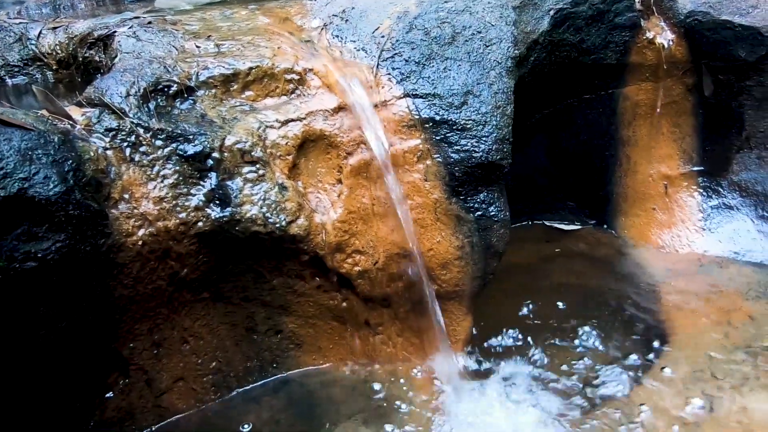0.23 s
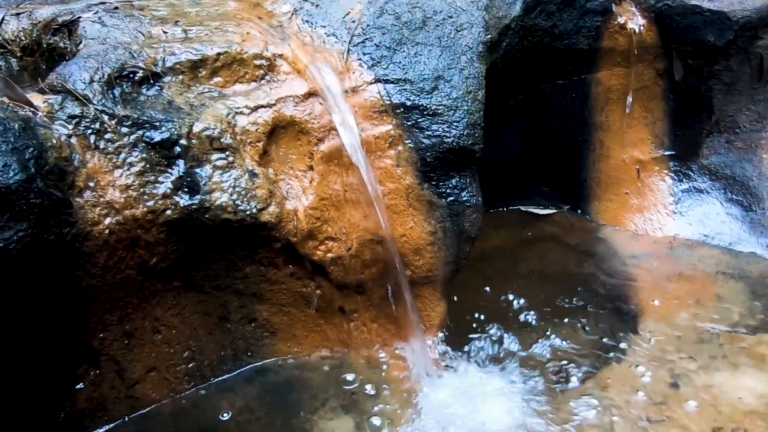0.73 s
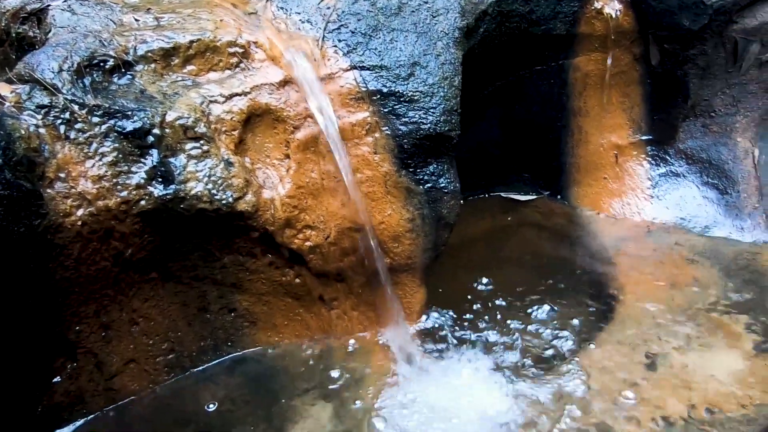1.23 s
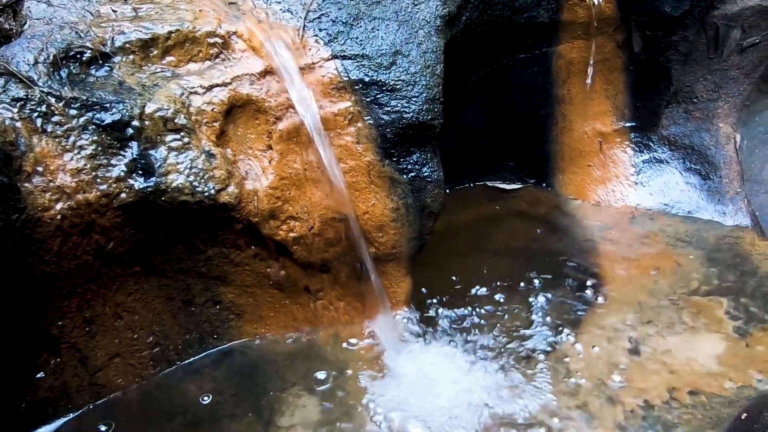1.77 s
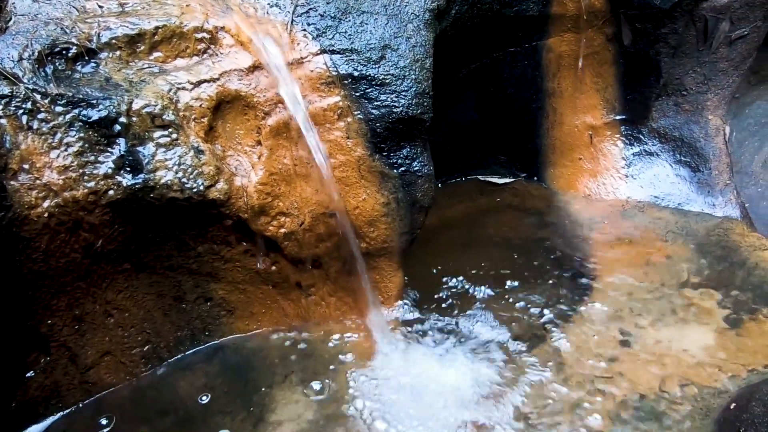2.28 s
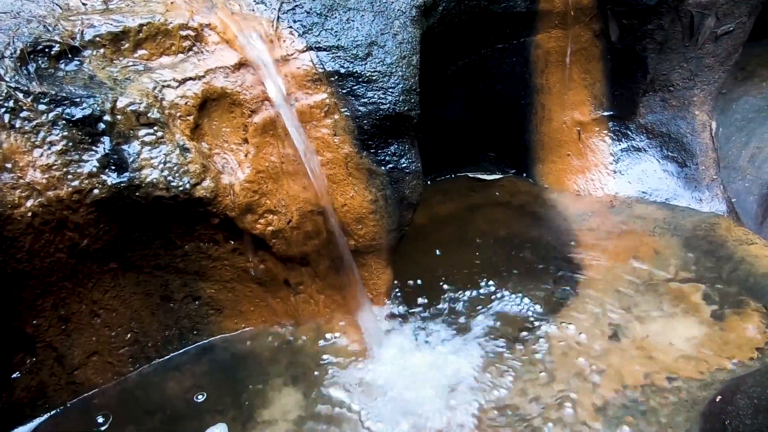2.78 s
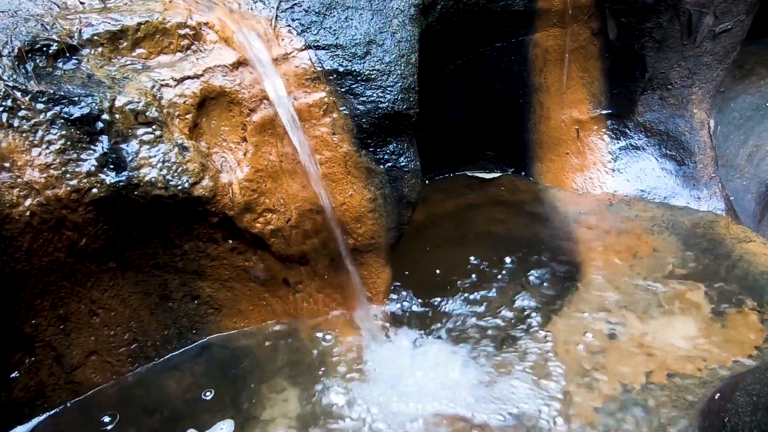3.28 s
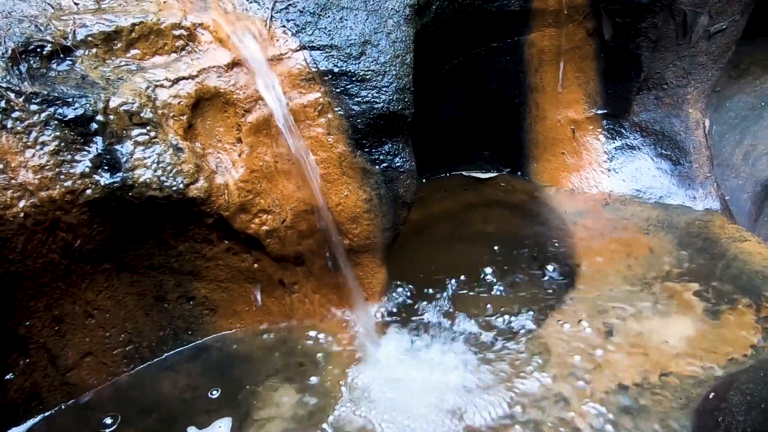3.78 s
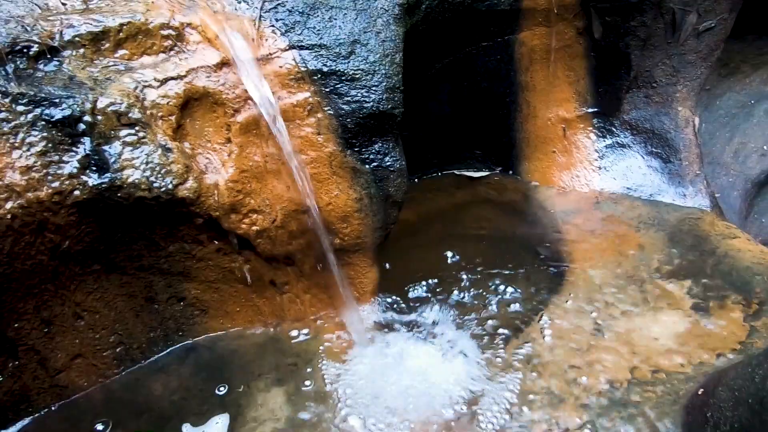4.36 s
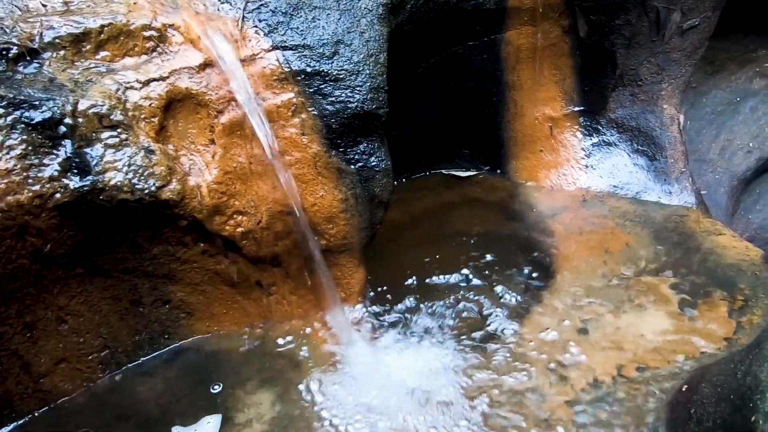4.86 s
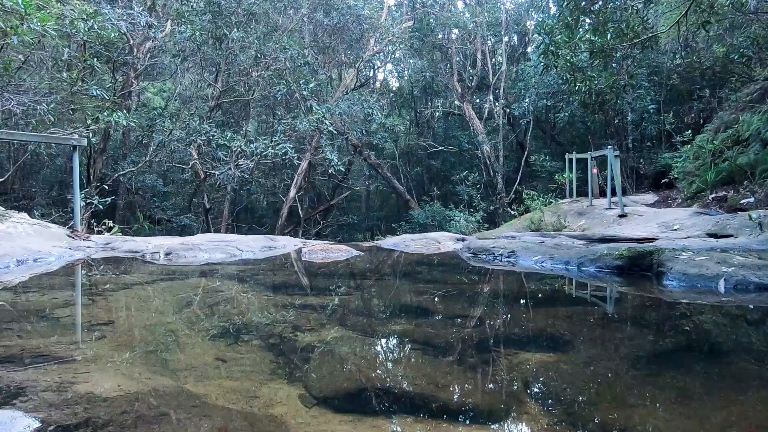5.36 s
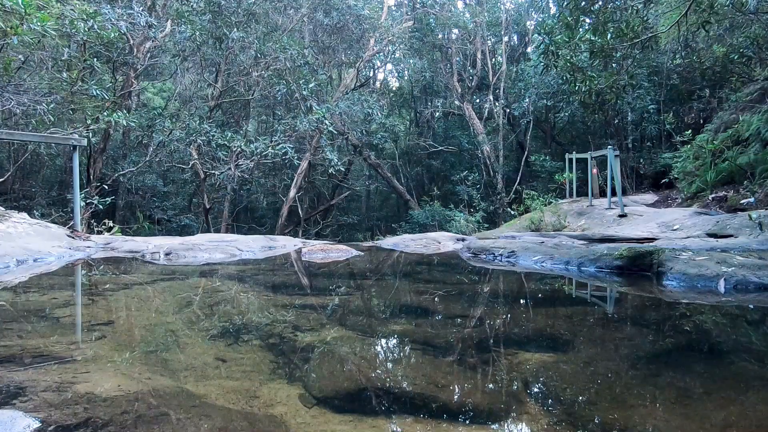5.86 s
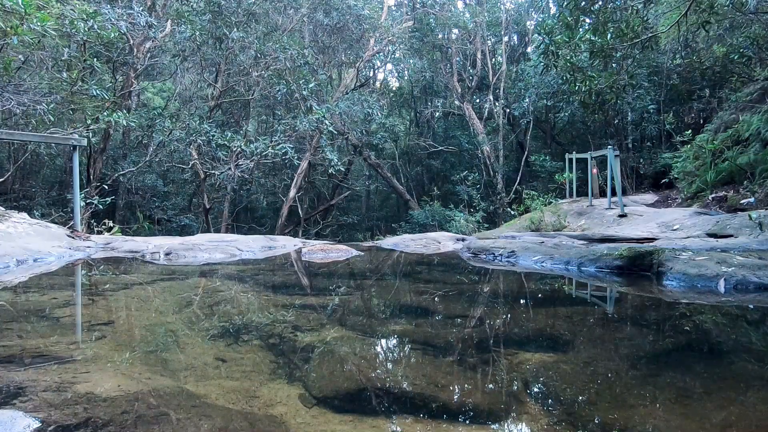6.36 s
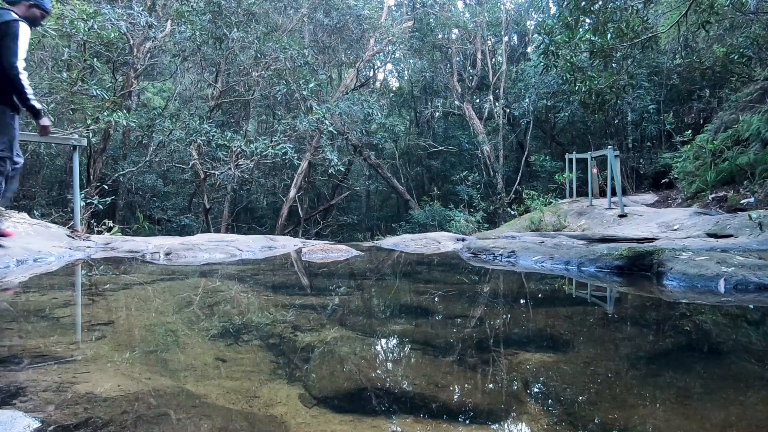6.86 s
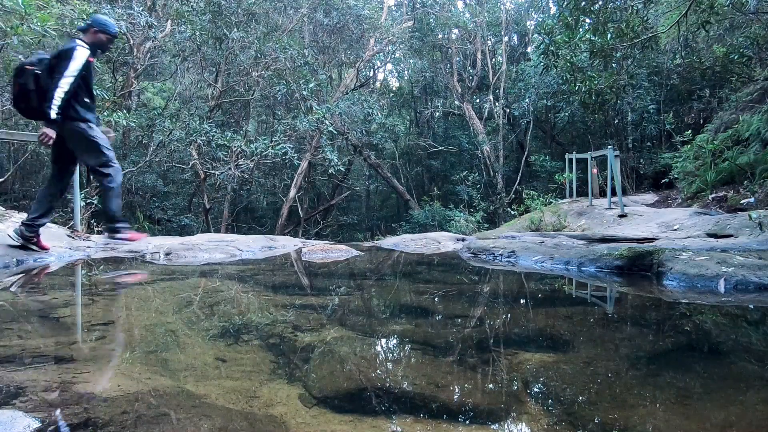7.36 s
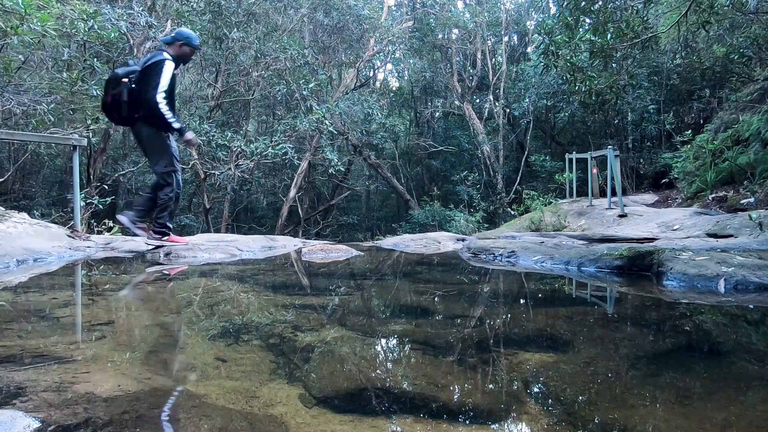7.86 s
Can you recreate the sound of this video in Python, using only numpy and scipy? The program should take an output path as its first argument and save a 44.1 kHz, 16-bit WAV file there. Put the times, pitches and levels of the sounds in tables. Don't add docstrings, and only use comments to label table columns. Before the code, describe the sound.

From 0 s, a thin stream plunges close by into a small pool in a rock hollow. The first second is boomy and nearly mono: heavy low glugs around 160-200 Hz, hollow mid bloops gliding upward, dense bubbling and tiny high pings. From about 0.5 to 2.3 s a bright spray hiss fades in and the image widens, while the glugs thin out. Through 2-5 s, irregular ringing drops around 2-3 kHz, sharp snaps and crisp spatters on stone ride over continuous gurgling, with strong plinks near 1.2 and 3.2 s. Between 5.05 and 5.65 s the pool drops away quickly. A much quieter forest pond remains: smooth far water hiss, dull air, faint low gurgles. Soft gritty footsteps on stone, slightly left, come near 6.05, 6.55, 6.9, 7.2 and 7.65 s, the last with a pebble click. One faint, steady bird whistle sounds at 7 s. It ends at about 8 s.

```python
import sys
import numpy as np
from scipy import signal
from scipy.fft import rfft, irfft, next_fast_len
from scipy.io import wavfile

SR = 44100
rng = np.random.default_rng(int(sys.argv[2]) if len(sys.argv) > 2 else 0)


def master_out(mix):
    frames = np.transpose(np.atleast_2d(mix))
    ceiling = np.clip(frames, -1, 1)
    pcm = np.round(ceiling * 32767).astype(np.int16)
    wavfile.write(sys.argv[1], SR, pcm)


def how_loud(loudness_db):
    steps = np.asarray(loudness_db, float) / 20
    return 10 ** steps


N = 358091
SIZE = next_fast_len(N + SR // 2)
HZ = np.maximum(np.arange(SIZE // 2 + 1) * SR / SIZE, 1)


def curves(rows):
    s, *columns = np.transpose(rows)
    return [np.interp(np.arange(N) / SR, s, c) for c in columns]


def at_hz(points, hz):
    f, value = np.array(points).T
    return np.interp(np.log(hz), np.log(f), value)


def rms_one(x):
    return x / np.sqrt(np.mean(x ** 2) + 1e-20)


def drift(rate):
    r = np.exp(-80 * np.pi * rate / SR)
    slow = signal.lfilter([1], [1, -2 * r, r * r], rng.standard_normal(N // 40 + 2002))[2000:]
    return np.interp(np.arange(N) / 40, np.arange(len(slow)), rms_one(slow))


def filtered(x, response):
    return irfft(rfft(x, SIZE) * response, SIZE)[..., :N]


def modes(table, direct_db):
    return how_loud(direct_db) + sum(how_loud(db) / (1 + 1j * (HZ - f * f / HZ) / width) for f, width, db in table)


def left_right(mid, side):
    return np.array([mid + side, mid - side])


def ramp(start_s, for_s):
    return np.clip((np.arange(N) / SR - start_s) / for_s, 0, 1)


def swells(rows, rise_s, fall_s):
    kicks, t = np.zeros(N), np.arange(SR // 2) / SR
    for s, db, *_ in rows:
        kicks[round(s * SR)] = how_loud(db)
    shape = (1 - np.exp(-t / rise_s)) * np.exp(-t / fall_s)
    return np.abs(signal.fftconvolve(kicks, shape / shape.max())[:N])


def plops(rows, cycles, rise, onset, trail_s=0, trail_db=-6, spread_oct=0, count=1):
    out, chance = np.zeros((2, N)), rng.random((len(rows), count, 2))
    chance[:, 0] = [0, .5]
    for (s, db, centre_hz, *pan_db), cluster in zip(rows, chance):
        pan = np.tanh(0.15 * sum(pan_db))
        for late, detune in cluster:
            hz = centre_hz * 2 ** (spread_oct * (2 * detune - 1))
            turn = np.arange(int(cycles * SR / hz)) * hz / SR
            shape = (1 - np.exp(-turn / onset)) ** 2 * how_loud(-60 * turn / cycles)
            level = how_loud(db + trail_db * np.sqrt(late)) / shape.max()
            wave = level * shape * np.sin(2 * np.pi * turn * (1 + rise * turn))
            i = round((s + trail_s * late) * SR)
            out[:, i:i + len(wave)] += wave[:N - i] * [[1], [pan]]
    return out


# t/s, level/dB
LEAVE = [
    (5.05, -6.5),
    (5.28, -11),
    (5.38, -14),
    (5.5, -11.5),
    (5.56, -25.5),
    (5.65, -65),
]


def nearness():
    return np.minimum(how_loud(curves(LEAVE)[0]), 1)


# t/s, level/dB
PLUNGE = [(0, 14), (.12, 5), (.47, 7.5), (.72, 6), (.95, 4.5), (1.3, 1), (1.7, 0), (2.1, 2.5), (2.5, -1),
          (2.85, 0.5), (3.1, 1), (4.2, -2), (5.0, -0.5), (5.2, 1)]


def plunge():
    return curves(PLUNGE)[0]


# f/Hz, width/Hz, level/dB
HOLLOW = [(161.8, 7.1, -12.5), (181, 29, -4), (403, 47.5, -3.5), (534.4, 9.3, -15.5), (700, 23, -9.5),
          (750.4, 17, -10), (1083, 92, -15), (1295, 132, -12), (1597, 64, -17.5), (1794, 146, -18),
          (2125, 31, -11.5), (2342, 68, -6.5), (2430, 20, -14.5), (2724, 35, -15.5), (2640, 41, -18),
          (2880, 41, -8.5), (3005, 71, -11.5), (3260, 59, -8.5), (4720, 1450, -18)]
# f/Hz, width/Hz, level/dB
ACROSS = [(155, 36, -94), (525, 41, -16), (757, 21, -7), (1160, 290, -13), (1600, 37, -9.5),
          (2020, 90, -13), (2290, 100, -10.5), (2900, 180, -27)]


def ring_hollow(mid_side):
    return filtered(mid_side, [modes(HOLLOW, direct_db=-20.0), modes(ACROSS, direct_db=-44.0)])


# f/Hz, level/dB
BUBBLES = [(120, -7), (250, -0.5), (500, 5), (1000, -0.5), (2000, -5), (3500, -7), (5000, -8.5),
           (6500, -15), (8500, -11), (10500, -24), (13000, -19)]


def froth(low_hz, high_hz, per_s, cycles, uneven_db, clump_db, wash_db, count):
    sizes = how_loud(uneven_db * np.minimum(rng.exponential(1, N), 5)) * rng.choice([-1, 1], N)
    births_per_s = per_s * how_loud(clump_db * drift(14))
    sizes = sizes * (rng.random(N) < births_per_s / SR)
    sizes = rms_one(sizes) + how_loud(wash_db) * rng.standard_normal(N)
    placed = np.array([sizes, sizes * rng.standard_normal(N)])
    dealt, out = rng.integers(0, count, N), 0
    for k, hz in enumerate(np.geomspace(low_hz, high_hz, count)):
        r, w = how_loud(-60 * hz / (cycles * SR)), 2 * np.pi * hz / SR
        resonance = [(1 - r * r) / 2, 0, (r * r - 1) / 2, 1, -2 * r * np.cos(w), r * r]
        soft = signal.sosfilt([resonance, resonance], placed * (dealt == k))
        out = out + how_loud(at_hz(BUBBLES, hz)) * soft
    return out


def bubble_crowds():
    plunge_db, near = plunge(), nearness()
    stir = swells(GLUGS, rise_s=0.0065, fall_s=0.14) / how_loud(-17.5)
    spit = swells(SPLATS + DROPS, rise_s=0.0042, fall_s=0.0086) / how_loud(-22)
    gurgle = how_loud(-8.5) * swells(FAR_GURGLES, rise_s=0.0061, fall_s=0.023)
    far = (how_loud(-64.5) + gurgle) * (1 - near)
    deep = froth(142.6, 197.8, per_s=240, cycles=6.3, uneven_db=3.0, clump_db=2.5, wash_db=0.6, count=3)
    middle = froth(322, 562, per_s=120, cycles=5.46, uneven_db=-1.0, clump_db=4.5, wash_db=1.5, count=3)
    plink = froth(643, 1406, per_s=450, cycles=13.8, uneven_db=2.5, clump_db=2.5, wash_db=-3.5, count=6)
    splash = froth(1630, 4215, per_s=1500, cycles=21.6, uneven_db=3.0, clump_db=2.0, wash_db=-4.5, count=10)
    fizz = froth(4900, 12100, per_s=2100, cycles=12.0, uneven_db=2.4, clump_db=2.0, wash_db=2.0, count=6)
    # crowd, level/dB at mean plunge, share of the plunge's swing, swell/dB, what swells it, level from afar
    crowds = [(deep, -41, 0.68, -1.6, stir, far),
              (middle, -45.5, 0.67, -0.76, stir, 0),
              (plink, -45, 0.44, -6.5, stir, 0),
              (splash, -39, 0.4, -1.5, spit, 0),
              (fizz, -51, 0.44, -2, spit, 0)]
    surge = how_loud(1.7 * drift(16.6))
    out = 0
    for crowd, db, share, swell_db, swell, afar in crowds:
        ringing = ring_hollow(crowd)
        close = near * how_loud(db + share * plunge_db) * (1 + how_loud(swell_db) * swell)
        out = out + (close + afar) * surge / np.std(ringing[0]) * ringing
    return out


# f/Hz, level/dB per Hz
RUMBLE = [(20, -10), (60, 3.5), (95, 2), (130, -27.5)]


def rumble(width):
    near = nearness() * how_loud(plunge() - 70 + 3.0 * drift(3.8))
    floor = how_loud(-82)
    mid, side = rms_one(filtered(rng.standard_normal((2, N)), how_loud(at_hz(RUMBLE, HZ))))
    return (near + floor) * left_right(mid, width * side)


# t/s, peak level/dB, f/Hz
PINGS = [
    (0.008, -49, 9200),
    (0.115, -42, 8900),
    (0.401, -41, 10100),
    (0.449, -44, 12400),
    (0.537, -39, 8840),
]


def pings():
    return how_loud(16) * plops(PINGS, cycles=49.0, rise=0.0005, onset=3.1)


# t/s, peak level/dB, f/Hz, left-right/dB
DROPS = [(0.011, -29, 4320, -2), (0.606, -33, 2350, 0.0), (0.7462, -30, 2320, 0.0), (1.1144, -42, 3330, 2),
         (1.1771, -38, 3270, 4), (1.242, -28, 2420, 0.0), (1.2704, -30, 2430, -2),
         (1.5312, -29.5, 2310, 0.0), (1.83, -28.5, 2270, 2), (2.0213, -28.5, 2300, -0.5),
         (2.183, -26.5, 2360, 2), (2.3165, -26.5, 2940, -1), (2.4932, -26, 2320, 5),
         (2.529, -26.5, 3000, 0.0), (2.5676, -28, 2010, 0.5), (2.727, -22.5, 3040, 0.0),
         (2.839, -26, 2400, 5), (3.009, -27, 4300, 0.0), (3.0385, -29, 2910, -0.5), (3.346, -28, 2330, 5),
         (3.443, -26, 3400, -0.5), (3.4855, -27, 2860, -0.5), (3.6366, -26, 2910, -1.5),
         (3.6494, -38, 2890, 0.0), (3.705, -37, 3350, -0.5), (3.7253, -28, 1570, 0.0),
         (4.121, -26, 2440, 4), (4.2163, -26, 2900, 1.5), (4.3254, -40, 2280, 3), (4.395, -43, 2370, 0.5),
         (4.434, -27.5, 2890, 0.0), (4.505, -33, 1580, 2), (4.5506, -32, 2290, 3), (4.5781, -26, 2330, 3),
         (4.616, -25, 3200, 0.0), (4.6391, -27, 1740, 0.5), (4.7434, -38, 3340, 0.0), (4.82, -24, 3030, 2),
         (4.8544, -26, 2450, 1.0), (4.9, -27, 2740, 0.5), (4.9294, -30, 2310, 1.0),
         (5.0574, -24, 2380, 1.5), (5.0744, -45, 3370, 1.0), (5.169, -30, 3000, 3),
         (5.2795, -25.5, 2080, 1.5), (5.323, -28, 3070, -1.5)]


def small_drops():
    return how_loud(5.0) * plops(DROPS, cycles=22.5, rise=0.0031, onset=1.9,
                            trail_s=0.007, trail_db=-6.5, spread_oct=0.37, count=3)


# t/s, peak level/dB, f/Hz
BLOOPS = [(0.038, -40, 490), (0.335, -30.5, 694), (0.415, -25, 780), (0.429, -29, 482), (0.454, -36, 756),
          (0.618, -36, 770), (0.726, -27, 490), (0.873, -32, 1350), (0.965, -31, 708), (1.077, -29, 1240),
          (1.187, -30, 670), (1.27, -24, 487), (1.352, -35, 1070), (1.53, -36, 674), (1.71, -31, 680),
          (1.775, -35, 754), (2.021, -34, 766), (2.156, -37, 708), (2.256, -32, 710), (2.809, -26.5, 890),
          (3.046, -39, 716), (3.214, -32, 477), (3.268, -31, 720), (3.343, -29, 1250), (3.72, -33, 746),
          (3.861, -27, 1360), (4.035, -32, 685), (4.136, -27, 750), (4.315, -36, 686), (4.475, -31, 725),
          (4.774, -34, 685), (4.868, -31, 745), (5.011, -47, 776)]


def bloops():
    return how_loud(6.5) * plops(BLOOPS, cycles=12.5, rise=0.014, onset=0.57,
                            trail_s=0.01365, trail_db=-2, spread_oct=0.29, count=2)


# t/s, peak level/dB, f/Hz
GLUGS = [(0.043, -20, 160), (0.185, -29.5, 157), (0.354, -27.5, 192), (0.439, -25, 165),
         (0.506, -25.5, 179), (0.68, -19, 190), (0.761, -22.5, 187), (0.837, -24.5, 181), (1.031, -21, 203),
         (1.274, -17, 178), (1.446, -27.5, 180), (1.536, -24, 176), (1.618, -21, 175), (1.66, -24, 190),
         (1.713, -21.5, 210), (2.196, -29, 182), (2.318, -27, 182), (2.455, -25, 192), (2.625, -22, 182),
         (2.904, -26.5, 161), (2.97, -29, 187), (3.212, -25, 193), (3.352, -26.5, 173), (3.394, -29.5, 158),
         (3.706, -29, 167), (4.059, -25, 164.5), (4.256, -33, 169), (4.322, -27.5, 175),
         (5.166, -24.5, 166), (5.281, -30, 176)]
# t/s, peak level/dB
GULPS = [(0.293, -27), (0.918, -30), (2.077, -29.5), (2.234, -36), (2.41, -41), (2.53, -39), (2.798, -32),
         (3.049, -42), (3.125, -32.5), (3.449, -28), (3.565, -30.5), (3.727, -29), (3.761, -34),
         (3.859, -34), (4.039, -32), (4.138, -26.5), (4.5, -35), (4.579, -29.5), (4.65, -29), (4.7, -40),
         (4.822, -33), (4.901, -34), (5.059, -28.5), (5.454, -38)]
# t/s, level/dB
FAR_GURGLES = [(5.561, -53), (5.699, -55), (5.841, -61), (6.232, -60), (6.088, -54), (6.126, -57),
               (6.379, -60), (6.56, -58), (6.665, -59), (6.889, -56.5), (7.265, -52), (7.46, -54.5),
               (7.63, -67), (7.75, -66), (7.83, -62), (7.998, -58)]
# t/s, peak level/dB, f/Hz
BLIPS = [(0.076, -29, 420), (0.184, -38, 384), (0.336, -27.5, 425), (0.414, -34, 404), (0.684, -27, 390),
         (0.702, -21.5, 386), (0.761, -20.5, 420), (0.8, -27, 405), (0.838, -26.5, 423), (0.956, -33, 443),
         (1.275, -47, 413), (1.533, -28.5, 420), (1.716, -32.5, 380), (2.07, -30.5, 415),
         (2.47, -28.5, 420), (2.654, -31.5, 372), (2.807, -39, 396), (2.933, -30.5, 405), (3.208, -29, 433),
         (4.135, -31, 394), (4.26, -32, 436), (4.82, -34, 364), (5.38, -35, 415), (5.67, -51.5, 420)]


def air_pockets():
    gulp_hz, lead_s = 171, 0.004
    gulps = [(s, db, gulp_hz) for s, db in GULPS]
    far = [(s, db + 10, gulp_hz) for s, db in FAR_GURGLES]
    deep = plops(GLUGS + gulps + far, cycles=10.3, rise=0.0056, onset=0.1,
                 trail_s=0.0033, trail_db=-18.5, spread_oct=1.47, count=3)
    middle = plops(BLIPS, cycles=25.0, rise=0.0058, onset=0.27)
    return np.roll(how_loud(5.5) * deep + how_loud(3.5) * middle, -round(lead_s * SR), axis=1)


# t/s, peak level/dB, f/Hz
SNAPS = [(0.2074, -34, 3580), (0.5132, -40, 3950), (0.6823, -36, 4410), (0.7652, -29, 3660),
         (1.0001, -35, 4380), (1.2116, -27, 3600), (1.2411, -34, 3840), (1.6172, -35, 4500),
         (1.7948, -30, 3540), (2.184, -25, 3620), (2.3166, -30, 4400), (2.446, -33, 3520),
         (2.6628, -31, 3550), (2.7018, -30, 3570), (2.8993, -30, 4030), (2.97, -28, 1910),
         (3.0086, -32, 4310), (3.1133, -27.5, 4000), (3.27, -27, 3200), (3.3997, -40, 4690),
         (3.5808, -34, 4490), (3.7259, -28, 5190), (3.7614, -35, 4050), (3.8586, -27, 3550),
         (4.0537, -32, 3510), (4.1699, -31, 4220), (4.5002, -27, 4800), (4.5775, -28, 4040),
         (4.6384, -31, 4100), (4.7446, -29, 3810), (5.0664, -30, 4140), (5.134, -28.5, 3600)]


def snaps():
    return how_loud(16) * plops(SNAPS, cycles=14.0, rise=0.006, onset=0.47)


# t/s, peak level/dB, f/Hz, left-right/dB
SPLATS = [(0.253, -24.5, 2490, 0.0), (0.684, -24, 2300, -4), (0.765, -24, 2290, -4), (0.98, -21, 3000, -2),
          (1.041, -22.5, 3100, 0.0), (1.213, -15, 2520, 16), (1.3155, -21.5, 3250, -1),
          (1.617, -24, 4870, 0.0), (1.729, -23, 2620, 0.0), (1.972, -21, 2500, -4.5),
          (2.225, -22.5, 2270, 6), (2.388, -21.5, 3230, -0.5), (2.631, -22, 2430, 4), (2.668, -18, 2940, 3),
          (2.977, -17.5, 2480, 5), (3.06, -25, 2290, 4), (3.1, -22, 2370, 4), (3.213, -14.5, 2130, 3),
          (3.262, -17.5, 3280, 3), (3.383, -22, 2880, 0), (3.56, -22, 2430, 4), (3.582, -20, 2740, 5),
          (3.76, -18.5, 3890, -5), (3.915, -18, 2770, 3), (4.053, -19.5, 3050, 4), (4.094, -22.5, 2720, 2),
          (4.284, -22.5, 3060, 0.5), (4.567, -22.5, 2400, 4), (4.758, -21.5, 3400, 2.5),
          (5.043, -32, 2430, 6)]
# t/s, peak level/dB, f/Hz, left-right/dB
MORE_SPLATS = [(0.4, -26, 1820, 0.0), (0.45, -25, 800, 0.0), (0.82, -27, 1160, 0.0), (1.0, -21.5, 1680, 0.0),
               (1.2705, -24.5, 616, 4), (0.922, -26, 2340, -10), (1.462, -25, 3000, 0.0),
               (1.597, -24.5, 1680, -6), (2.375, -32.5, 1120, 3), (2.493, -24, 1660, 5), (2.702, -32.5, 730, -5),
               (3.521, -25.5, 830, -3.5), (3.686, -29, 1140, 4), (4.638, -25, 1620, 8.5), (4.06, -27, 920, 1),
               (5.269, -28, 1680, 4), (5.47, -46, 740, -5), (0.875, -24.5, 2330, -4), (3.858, -22, 2830, -4),
               (4.676, -23, 3030, 0.0), (4.875, -25.5, 2260, 2)]


def bright_drops():
    return how_loud(4.0) * plops(SPLATS + MORE_SPLATS, cycles=22.0, rise=0.0044, onset=1.55,
                            trail_s=0.0098, trail_db=-7.5, spread_oct=0.32, count=5)


def pool(width):
    drops = pings() + small_drops() + bloops() + snaps() + bright_drops()
    singles = drops * how_loud([[0], [4]]) + air_pockets()
    mid, side = bubble_crowds() + ring_hollow(singles)
    return left_right(mid, width * side)


# f/Hz, level/dB per Hz
HISS = [(530, -44), (900, -8.5), (967, -13), (1350, -6.5), (2120, -4), (2960, 1.5), (5000, -0.5),
        (6580, -1), (9070, -3.5), (11000, -23), (13300, -24.5), (14800, -27), (15500, -26)]
# f/Hz, side over mid/dB
HISS_SIDE = [(900, 0.5), (2400, -7), (4200, -10.5), (5500, -2.5), (8000, 0.5), (15000, 2)]
HISS_ZONES_HZ = [2000, 5000, 8500, 13000]


def hiss():
    out, together = 0, 1.34 * drift(25)
    flicker = 0.31 + 0.88 * nearness()
    mid_db = at_hz(HISS, HZ)
    colour = how_loud([mid_db, mid_db + at_hz(HISS_SIDE, HZ)])
    for k in range(len(HISS_ZONES_HZ)):
        only_k = np.arange(len(HISS_ZONES_HZ)) == k
        zone = np.sqrt(at_hz(np.c_[HISS_ZONES_HZ, only_k], HZ))
        grains = rng.standard_normal((2, N)) * how_loud(1.8 * np.minimum(rng.exponential(1, (2, N)), 6))
        grains = grains * how_loud(flicker * (together + 2.06 * drift(53)))
        out = out + filtered(grains, zone * colour)
    return left_right(*out) / np.std(out[0])


# t/s, peak level/dB, top end level/dB
TICKS = [(0.5362, -32, -26), (0.9712, -29, -22), (1.6931, -30, -26), (1.8073, -31, -26), (1.9709, -34, -22),
         (2.386, -29, -25), (2.583, -27, -26), (2.6623, -27, -27), (2.7232, -25, -26), (2.8988, -23, -28),
         (2.989, -18, -25), (3.262, -22, -21), (3.3438, -34, -20), (3.5895, -24, -23), (3.7618, -24, -24),
         (3.8585, -22, -22), (3.9823, -23, -22), (4.0592, -25, -24), (4.3256, -25, -22), (4.6389, -24, -25),
         (4.743, -28, -24), (4.9891, -27, -26), (5.0544, -30, -24), (5.0923, -41, -25)]


def ticks(width):
    rise_s, fall_s = 0.00024, 0.0022
    noise = rng.standard_normal((2, 2, N))
    low_band = signal.butter(2, [4500, 9300], "band", fs=SR, output="sos")
    high_band = signal.butter(2, [9500, 14500], "band", fs=SR, output="sos")
    low = rms_one(signal.sosfilt(low_band, noise[0]))
    high = rms_one(signal.sosfilt(high_band, noise[1]))
    tops = [(s, db + top_db - 7) for s, db, top_db in TICKS]
    mid, side = low * swells(TICKS, rise_s, fall_s) + high * swells(tops, rise_s, fall_s)
    return how_loud(-15) * left_right(mid, width * side)


# f/Hz, level/dB per Hz
POND = [(18, -54), (30, 6), (91, -60), (142, -9), (173, -4.5), (256, -7.5), (373, -12.5), (695, -10.5),
        (1120, -18), (1230, -14), (1500, -20), (1950, -13), (3300, -120)]
# f/Hz, width/Hz, level/dB
DRONE = [(271, 18, -76), (420, 16, -74)]


def pond():
    mid, side = filtered(rng.standard_normal((2, N)), how_loud(at_hz(POND, HZ)))
    air = left_right(mid, how_loud(-6.5) * side) / np.std(mid)
    hum = 0
    for f, width, db in DRONE:
        narrow = modes([(f, width, 0)], -99) ** 2
        hum = hum + how_loud(db + 59.5) * rms_one(filtered(rng.standard_normal(N), narrow))
    return air + left_right(0, hum)


# t/s, length/s, level/dB, centre f/Hz
SCUFFS = [
    (6.02, 0.055, -58, 660),
    (6.043, 0.097, -53, 1700),
    (6.554, 0.065, -53, 1500),
    (6.874, 0.1, -52, 1690),
    (7.173, 0.05, -51, 1600),
    (7.118, 0.092, -52, 3780),
    (7.18, 0.07, -44.5, 3780),
    (7.26, .03, -59, 3500),
    (7.63, 0.11, -55, 1500),
    (7.707, 0.091, -60, 398),
]
# t/s, peak level/dB, f/Hz, left-right/dB
STEPS = [(6.034, -49, 259, 1), (6.041, -51, 334, -1), (6.046, -65, 520, 2), (6.052, -52, 764, 5),
         (6.07, -48, 1350, 4), (6.049, -46, 1500, 11), (6.089, -42, 2010, 15), (6.348, -49, 283, -1),
         (6.545, -43.5, 1040, 4), (6.546, -51.5, 397, 1), (6.585, -49, 1500, 9), (6.909, -44, 1700, 10),
         (7.119, -56.5, 283, -1), (7.207, -43, 1480, 4), (7.621, -51, 800, 2), (7.687, -52, 1350, -4),
         (7.66, -55, 270, 2), (7.734, -49, 290, -1), (7.765, -56, 420, -3)]
# t/s, peak level/dB, f/Hz, left-right/dB
CLICKS = [
    (6.546, -57, 800, 3),
    (7.207, -51, 1600, 3),
    (7.623, -47, 800, 2),
    (7.6855, -36, 1450, 2),
    (7.7395, -45, 1400, -2),
]


def walker():
    t, scuff = np.arange(N) / SR, 0
    grit = rng.standard_normal(N) * how_loud(0.94 * drift(150))
    for s, length, db, hz in SCUFFS:
        stroke = how_loud(db) * np.sin(np.pi * np.clip((t - s) / length, 0, 1)) ** 2
        scuff = scuff + stroke * rms_one(filtered(grit, modes([(hz, 0.97 * hz, 0)], -99) ** 3))
    knocks = plops(STEPS, cycles=8.2, rise=0.012, onset=0.31,
                   trail_s=0.0073, trail_db=-8.5, spread_oct=0.66, count=5)
    pebbles = plops(CLICKS, cycles=3.8, rise=0.01, onset=0.17,
                    trail_s=0.0019, trail_db=-6.0, spread_oct=0.36, count=3)
    return left_right(*how_loud(3.0) * (knocks + pebbles)) + scuff * how_loud([[2.5], [-2.5]])


# t/s, peak level/dB, f/Hz
PEEP = [
    (6.997, -50.5, 2850),
]


def bird():
    return left_right(*plops(PEEP, cycles=360.0, rise=.0001, onset=25.0))


def scene():
    open_s, open_tau_s, wide_db = 0.87, 1.3, -4
    since_open = np.maximum(np.arange(N) / SR - open_s, 0)
    width = how_loud(wide_db) * (1 - np.exp(-since_open / open_tau_s))
    near = nearness()
    spray = ramp(0.45, 1.86) * (near * how_loud(-42.5) + (1 - near) * how_loud(-46.5))
    air = ramp(4.6, 0.9) * how_loud(-60)
    lean_db = 0.24 * (1 - near)
    surroundings = (spray * hiss() + air * pond()) * how_loud([lean_db, -lean_db])
    sound = pool(width) + surroundings + ticks(width) + walker() + bird()
    bass_loss = signal.butter(4, 108, "high", fs=SR, output="sos")
    return signal.sosfilt(bass_loss, sound) + rumble(width)


def top_cut(x):
    return signal.sosfilt(signal.butter(12, 15719, fs=SR, output="sos"), x)


def record(dry):
    mix = signal.sosfilt(signal.butter(2, 13500, fs=SR, output="sos"), dry)
    return top_cut(mix)


dry = scene()
out = record(dry)
master_out(out)
```